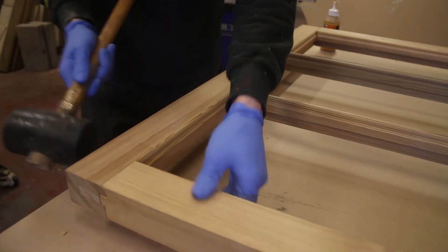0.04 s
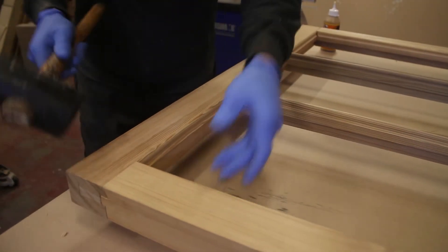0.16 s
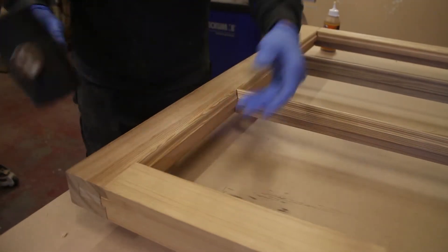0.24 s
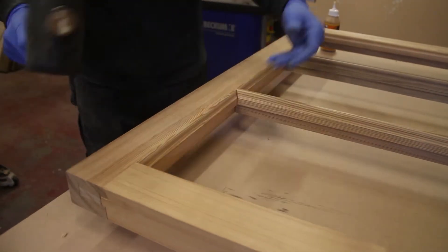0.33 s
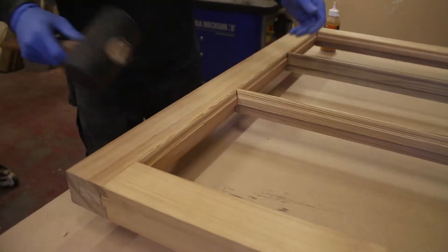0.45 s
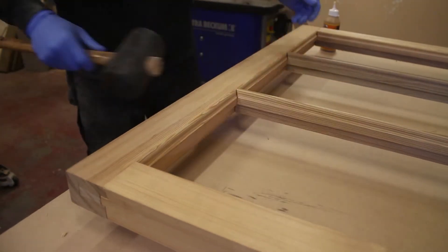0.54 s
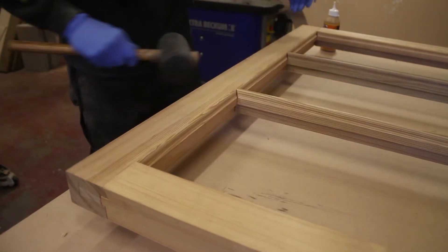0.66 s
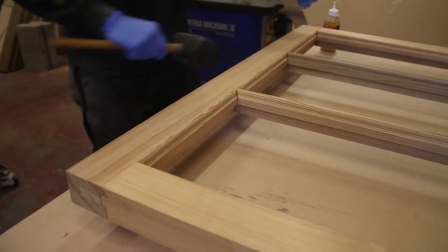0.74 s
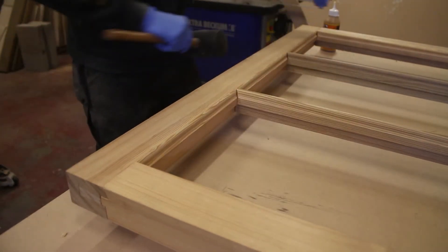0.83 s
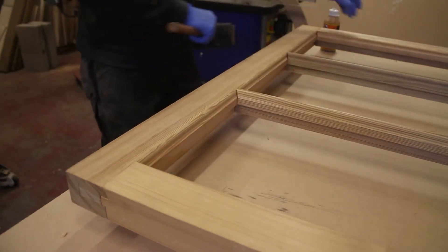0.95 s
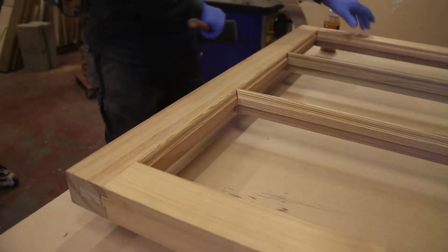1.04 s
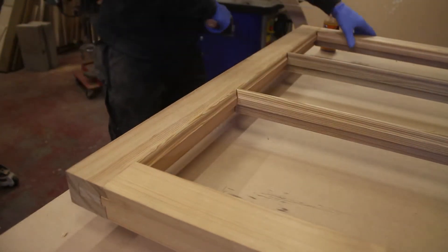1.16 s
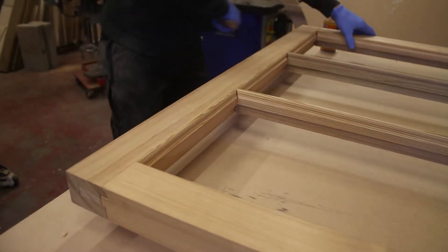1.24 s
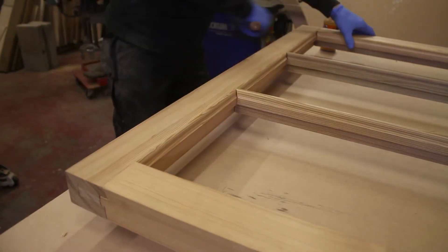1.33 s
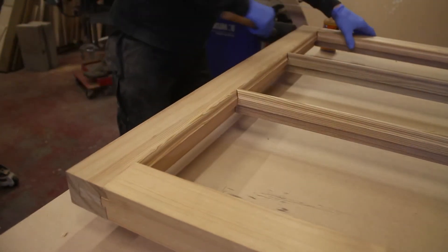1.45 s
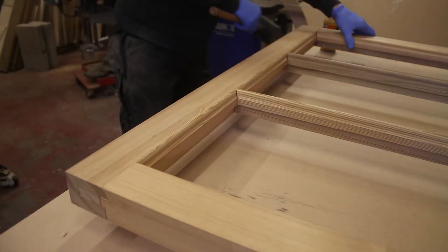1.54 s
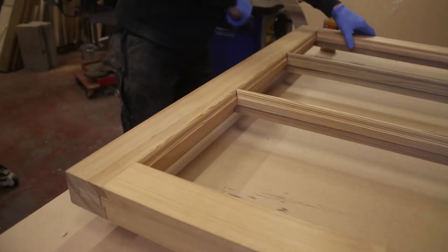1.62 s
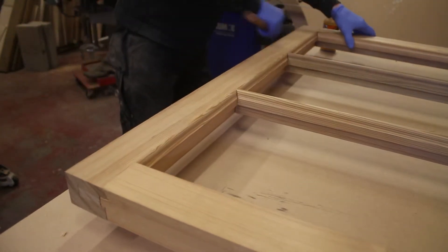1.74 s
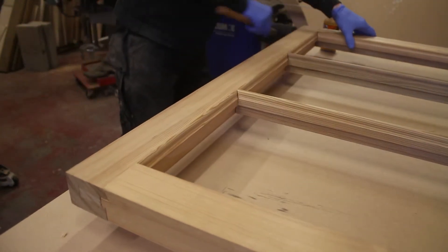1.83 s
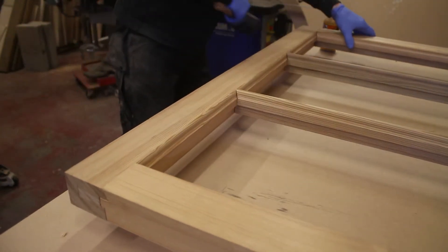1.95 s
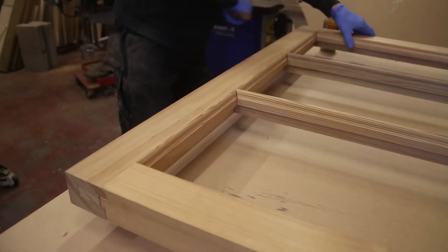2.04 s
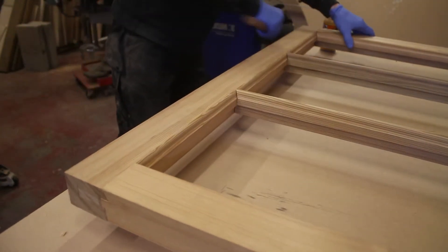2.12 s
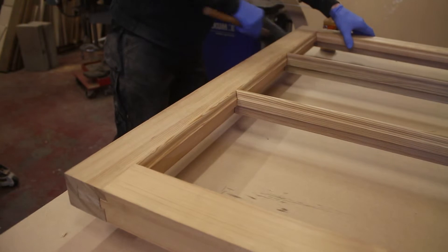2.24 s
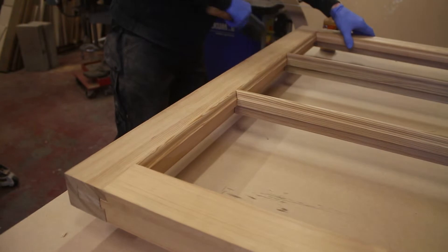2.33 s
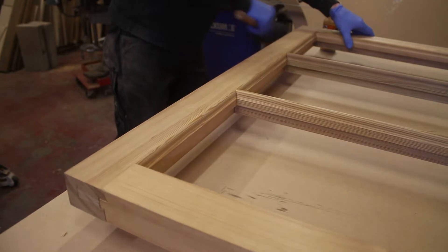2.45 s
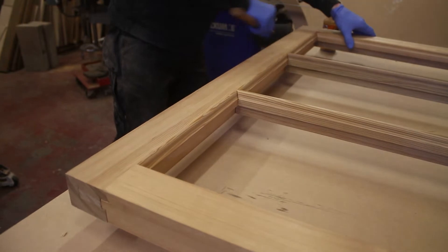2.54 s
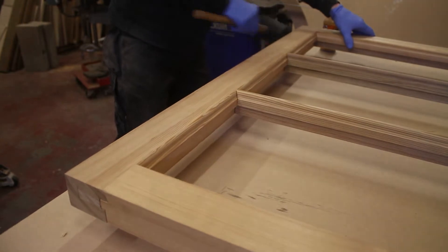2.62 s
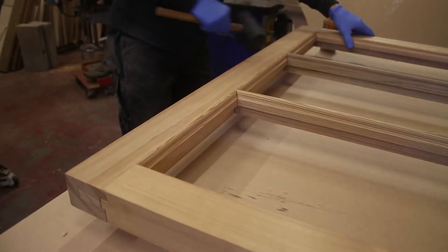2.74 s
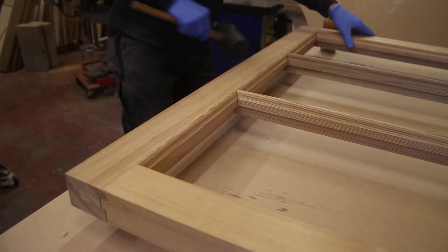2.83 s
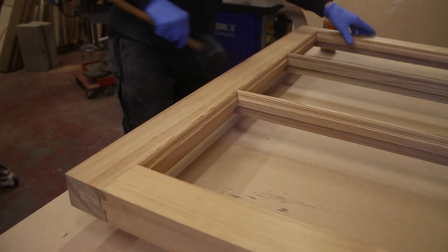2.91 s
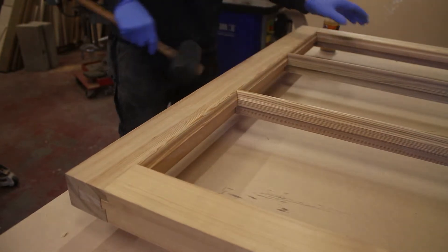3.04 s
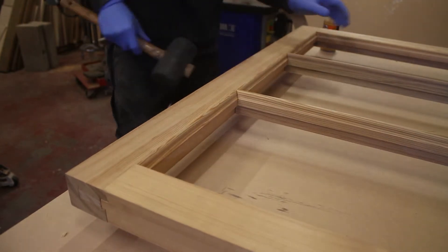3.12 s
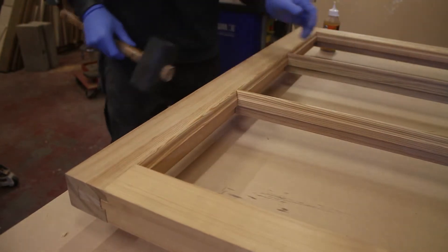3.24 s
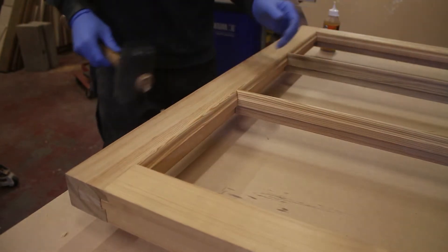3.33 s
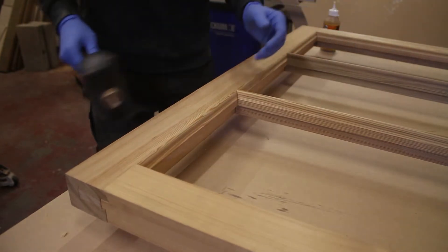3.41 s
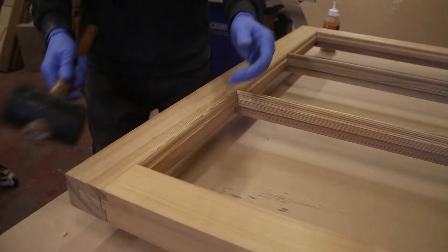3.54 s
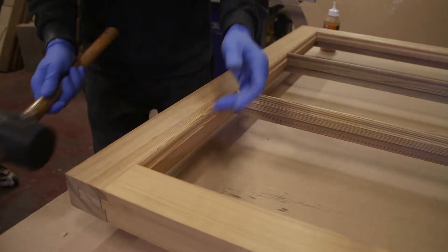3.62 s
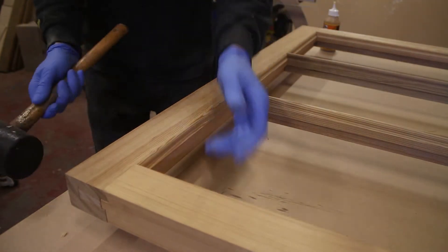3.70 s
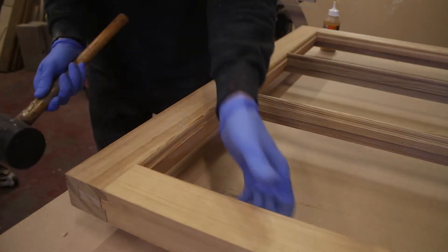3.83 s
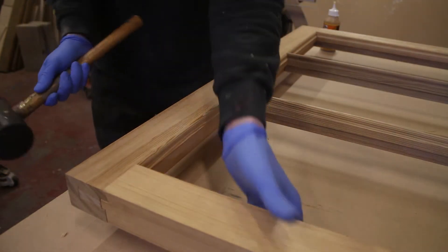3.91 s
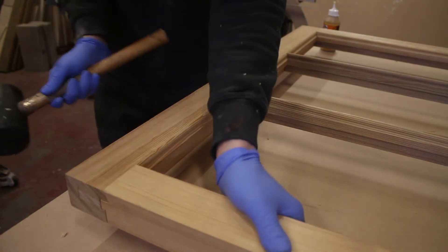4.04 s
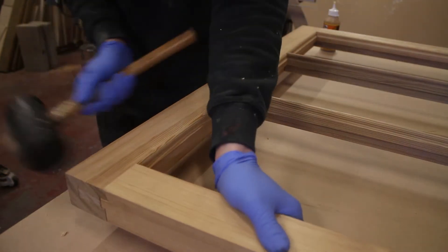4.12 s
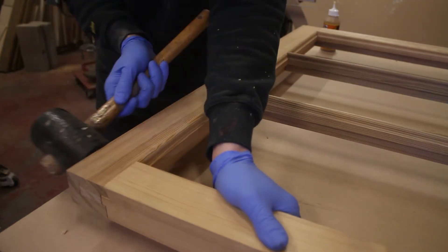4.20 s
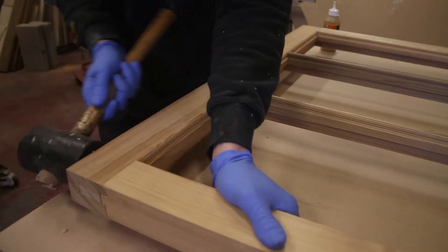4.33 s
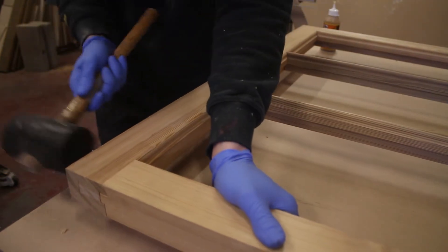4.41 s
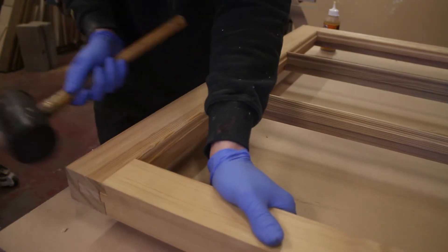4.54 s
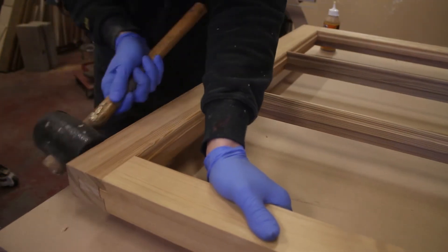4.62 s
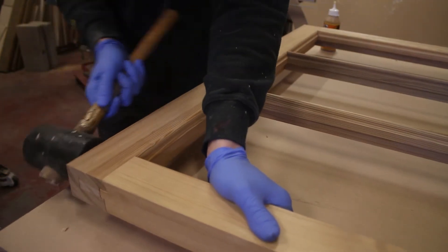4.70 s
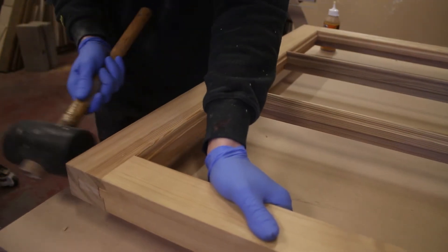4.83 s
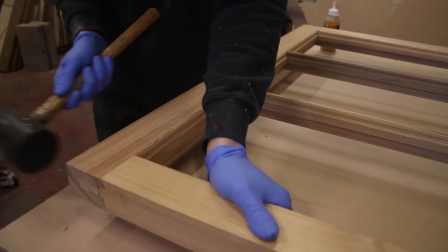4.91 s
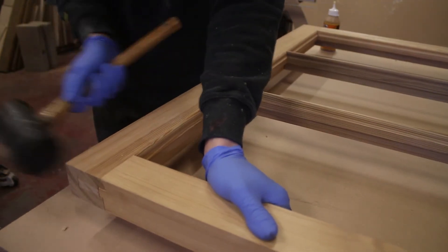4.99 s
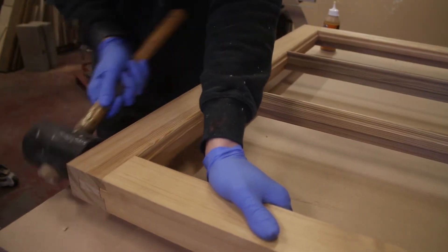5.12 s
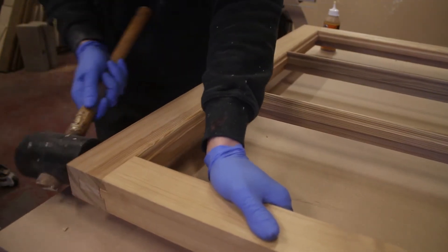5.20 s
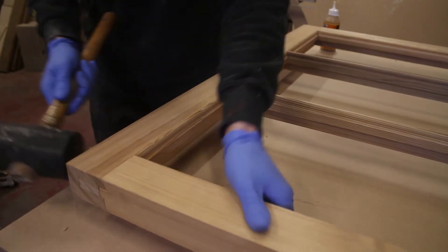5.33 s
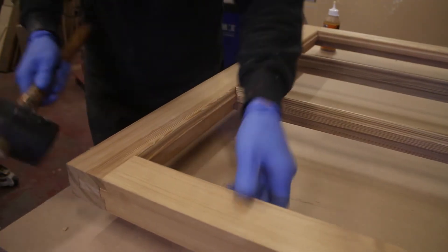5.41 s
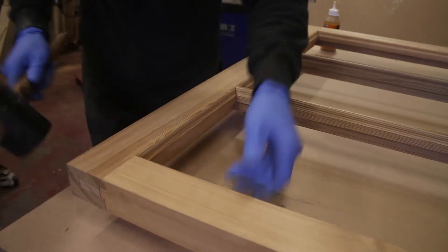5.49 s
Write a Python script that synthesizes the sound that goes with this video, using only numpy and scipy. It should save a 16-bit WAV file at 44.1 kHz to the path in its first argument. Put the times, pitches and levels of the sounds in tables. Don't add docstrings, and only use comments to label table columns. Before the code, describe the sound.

Loud, clipped mallet cracks ring a glued wooden frame, with room echo, cloth rubs and faint lamp hum between the blows.

```python
import sys
import numpy as np
from scipy import signal
from scipy.fft import rfft, irfft
from scipy.io import wavfile
from scipy.ndimage import uniform_filter1d

SR = 44100
rng = np.random.default_rng(int(sys.argv[2]) if len(sys.argv) > 2 else 0)


def unload_wav(signal):
    wavfile.write(
        sys.argv[1],
        SR,
        np.round(np.clip(np.atleast_2d(signal).T, -1, 1) * 32767).astype(np.int16),
    )


def volts_from_db(level):
    exponent = np.asarray(level, float) / 20
    return 10 ** exponent


N = 245195

# f/Hz, level/dB per Hz
AIR = [(15, -28), (30, -18.5), (70, -15.5), (130, -13), (250, -11.5), (420, -20), (620, -21.5), (1100, -19),
       (1700, -23.5), (3000, -31.5), (6000, -33.5), (11000, -40), (16000, -47.5)]
# f/Hz, side minus mid/dB
AIR_SIDE = [(60, -4.5), (110, 1), (200, -7.5), (380, -1.5), (700, -1), (1290, -4.5), (2380, 2), (4400, 1.5),
            (8120, 1), (15000, 1)]
# f/Hz, rms level/dB
HUM = [(50, -65), (100, -54), (150, -60.5), (200, -59), (300, -58.5), (400, -58), (500, -65.5)]
# t/s, peak level/dB, f/Hz, time to fall 60 dB/s
TAPS = [(3.212, -30, 231, 0.027), (3.213, -33, 502, 0.045), (3.24, -36.5, 253, 0.05),
        (3.272, -39, 260, 0.039), (3.293, -40, 254, 0.032), (3.309, -38, 232, 0.034),
        (3.373, -35, 200, 0.012), (4.10, -40, 167, .2), (4.119, -48, 189, 0.17), (4.136, -40, 180, 0.15),
        (4.243, -34.5, 166, 0.13)]
# t/s, half length/s, level/dB
SWISHES = [
    (0.126, 0.032, -52),
    (0.368, 0.014, -58),
    (2.972, 0.013, -55),
    (3.003, 0.012, -52.5),
    (3.04, .006, -54),
    (4.033, .006, -48),
    (5.432, 0.057, -47.5),
]
# peak t/s, level/dB, 20 dB rise/s, 20 dB fall/s, brightness/dB
SLEEVE_STROKES = [
    (.242, -46.5, .06, .3, -8.5),
    (.466, -55, 0.055, .06, 8),
    (.56, -60, 0.14, .2, 5),
    (.992, -48.5, 0.056, .17, 1.5),
    (1.25, -52.5, 0.022, .3, -1),
    (1.344, -46, 0.14, .3, 2),
    (1.436, -56.5, 0.032, .01, 0),
]
GLOVE_STROKES = [
    (2.974, -59.5, .1, 0.27, 17),
    (3.224, -65, 0.036, 0.21, -21),
    (3.36, -54.5, 0.072, 0.12, 10),
    (3.55, -57.5, 0.3, .5, 10),
    (3.735, -35, 0.039, 0.11, -2),
    (3.785, -37.5, 0.094, 0.22, 1),
    (4.09, -45.5, 0.03, 0.054, 11),
    (4.02, -60, 0.14, 0.37, 13),
    (4.24, -59, 0.044, 0.045, 7),
]
# f/Hz, width/Hz, level/dB
RUB_PEAKS = [(630, 90, -2.0), (2100, 300, 1.0), (3050, 400, -1.0)]
# t/s, level/dB, f/Hz, length/s
GRAZE = (5.1286, -14.0, 8000, .002)
# t/s, overload/dB, knock/dB, echo bass/dB, echo treble/dB
FAR_BLOWS = [
    (1.4478, 17.5, -9, 12, 9.5),
    (1.8298, 22.5, -13.5, 9.5, 3.5),
    (2.2013, 23.5, -15, 3.5, 7.5),
    (2.5552, 21.5, -9, 7, 4.5),
]
NEAR_BLOWS = [
    (-.11, 22.85, 0, 0.092, .1),
    (4.2624, 23.1, -13.5, 6.5, 0.042),
    (4.6869, 23.4, -12.5, 0.033, 0.72),
    (5.1304, 24, -16.5, 0.81, 0.12),
]
# f/Hz, level/dB, time to fall 60 dB/s
FAR_MODES = [
    [(278, -10, 0.14), (541, -10, 1.0), (830, -17, 0.079), (1170, 6, 0.0058), (1597, -16.5, 0.083),
     (2000, -8, 0.026), (4320, -11, 0.012), (4540, -30, 0.19)],
    [(532, 7, 0.081), (686, -5, 0.12), (840, -4.5, 0.14), (1140, -2.5, 0.089), (1540, -4.5, 0.41),
     (2310, 4.5, 0.083), (3080, -7.5, 0.027), (3260, -47.5, 0.26)],
    [(526, 5.5, 0.13), (802, -1.5, 0.086), (1090, -3.5, 0.34), (1380, -11, 0.16), (1630, -3.5, 0.11),
     (2495, 3.5, 0.024), (3000, -8, 0.05), (3460, -3.5, 0.022)],
    [(696, -1, 0.17), (1205, -4, 0.027), (1630, 4.5, 0.0068), (2100, -24, 0.14), (2550, -10.5, 0.021),
     (4270, -14, 0.017), (4820, -4, 0.0061), (5600, -85, 0.093)],
]
# f/Hz, level/dB, time to fall 60 dB/s
NEAR_MODES = [
    [],
    [(699, -1.5, 0.096), (1130, -5.5, 0.0068), (1520, -9.5, 0.048), (1860, 3, 0.011), (3350, -37, 0.011),
     (3920, -44.5, 0.11), (4160, -8, 0.031), (5814, -42, 0.016)],
    [(610, 5.5, 5.0), (1220, -4, 0.011), (1750, -6.5, 0.041), (2390, 5.5, 0.014), (2540, 5.5, 0.018),
     (2980, 7.5, 0.0068), (3470, -19, 0.019), (4324, 3.5, 0.0063)],
    [(722, 13, 5.0), (1150, 5.5, 0.1), (1637, -6, 5.0), (2530, 4, 0.011), (2790, 4, 0.026),
     (3600, -36, 0.097), (3920, -8.5, 0.015), (5240, -23, 0.046)],
]
# f/Hz, level/dB per Hz
FAR_ECHO = [(24, -64), (45, -27), (87, -12.5), (137, -11), (175, -5.5), (345, -2.5), (714, 6.5), (940, 2),
            (1440, 0.5), (1750, -8.5), (2400, -10), (4600, -24.5), (5300, -25.5), (9500, -32), (15500, -48)]
# f/Hz, level/dB per Hz
NEAR_ECHO = [(24, -52), (45, -26.5), (127, -12.5), (175, -5), (328, -7.5), (480, -0.5), (696, -4),
             (872, -7.5), (1300, -1.5), (1670, -14.5), (2440, -12.5), (4700, -22.5), (5500, -23.5),
             (9500, -32), (15500, -44.5)]
# f/Hz, level/dB per Hz
FIRST_ECHO = [(24, -57), (40, -33.5), (130, -22.5), (175, -11.5), (382, -13.5), (503, -10.5), (872, -12),
              (1150, -2), (1630, -19), (1900, -19), (4450, -28), (8320, -40), (16000, -49)]
# f/Hz, width/Hz
RAILS = [(240, 64), (730, 290), (1140, 40), (2400, 990), (3900, 2200)]
FAR_LIFT = (3.4, 1.2, 5.3, 0.42, 1.1)
NEAR_LIFT = (3.6, 5.1, 2.45, 0.91, 0.58)
# f/Hz, width/Hz, lift/dB
FAR_SPOTS = [
    (400, 750, 4.5),
    (1516, 150, 2.5),
    (1890, 1050, 5.5),
    (734, 35, 4.5),
]
# f/Hz, width/Hz, lift/dB
NEAR_SPOTS = [
    (1110, 33, 1),
    (1920, 350, 7.4),
    (2380, 400, 2.2),
    (1176, 250, 2.15),
]
# f/Hz, time to fall 60 dB/s
ROOM_T60 = [(60, 1), (160, 0.53), (420, 0.62), (1100, 0.58), (2910, 0.65), (7680, 0.48), (15000, 0.14)]
# f/Hz, side minus mid/dB
ROOM_SIDE = [(60, -6.5), (110, -11), (200, -14.5), (380, -17), (700, -12), (1290, -9.5), (2380, -6.5),
             (4400, -6.5), (8120, 0), (15000, 2.5)]


def at_hz(points, hz):
    table = np.array(points)
    return np.interp(np.log(np.maximum(hz, 1)), np.log(table[:, 0]), table[:, 1])


def rms_one(x):
    return x / np.sqrt(np.mean(x ** 2) + 1e-20)


def add(out, sound, s):
    i = round(s * SR)
    part = sound[:, max(-i, 0):N - i]
    start = max(i, 0)
    out[:, start:start + part.shape[1]] += part


def diffuse(gain, side_table, size):
    mid, side = rfft(rng.standard_normal((2, size))) * gain / np.sqrt(np.mean(gain ** 2))
    side = side * volts_from_db(at_hz(side_table, np.fft.rfftfreq(size, 1 / SR)))
    return np.array([mid + side, mid - side])


def resonate(x, hz, sharpness):
    return signal.lfilter(*signal.iirpeak(hz, sharpness, fs=SR), x)


def workshop():
    t = np.arange(N) / SR
    air_gain = volts_from_db(at_hz(AIR, np.fft.rfftfreq(N, 1 / SR)))
    out = volts_from_db(-53) * irfft(diffuse(air_gain, AIR_SIDE, N), N)
    wavers_db = [0.52 * rms_one(uniform_filter1d(rng.standard_normal(N), size=5000)) for line in HUM]
    for (hz, db), waver_db in zip(HUM, wavers_db):
        out = out + volts_from_db(db - 0.5 + waver_db) * np.sin(2 * np.pi * (hz * t + rng.random()))
    return out


def taps():
    out, t = np.zeros((2, N)), np.arange(round(.2 * SR)) / SR
    muffle = signal.butter(2, 600, fs=SR, output="sos")
    for s, db, hz, t60 in TAPS:
        puff = signal.sosfilt(muffle, rng.standard_normal((2, len(t))))
        ring = np.sin(2 * np.pi * hz * t)
        onset = np.minimum(t / 0.00062, 1)
        add(out, volts_from_db(db - 60 * t / t60) * (ring + 1.7 * puff) * onset, s)
    return out


def band_noise(low_hz, high_hz, grain_db):
    uneven = volts_from_db(grain_db * rms_one(uniform_filter1d(rng.standard_normal(N), size=300)))
    low_cut = signal.butter(1, low_hz, "high", fs=SR, output="sos")
    high_cut = signal.butter(3, high_hz, fs=SR, output="sos")
    rough = rng.standard_normal((2, N)) * uneven
    mid, side = signal.sosfilt(np.vstack([low_cut, high_cut]), rough)
    return rms_one(np.array([mid + 0.71 * side, mid - 0.11 * side]))


def hollow(x, peaks):
    out = x
    for hz, width, db in peaks:
        out = out + volts_from_db(db) * rms_one(resonate(x, hz, hz / width))
    return rms_one(out)


def brushing():
    t, out = np.arange(N) / SR, 0
    sleeve = band_noise(1900, 4280, grain_db=1.7)
    glove = hollow(2 * band_noise(1000, 4200, grain_db=1.0), RUB_PEAKS)
    dull = band_noise(200, 460, grain_db=1.0)
    thin = band_noise(7600, 8300, grain_db=1.8)
    for strokes, rub in [(SLEEVE_STROKES, sleeve), (GLOVE_STROKES, glove)]:
        for s, db, rise, fall, bright_db in strokes:
            stroke = volts_from_db(db - 20 * np.maximum((s - t) / rise, (t - s) / fall))
            friction = rub + volts_from_db(-7.5 - bright_db) * dull + volts_from_db(-17 + bright_db) * thin
            out = out + stroke * friction
    for s, half, db in SWISHES:
        out = out + thin * volts_from_db(db) * np.exp(-((t - s) / half) ** 2)
    return out


def graze():
    s, db, hz, length = GRAZE
    t = np.arange(N) / SR - s
    squeak = rms_one(resonate(rng.standard_normal(N), hz, 5.0))
    swell = np.clip(t / length, 0, 1) * (t < 1.6 * length)
    return volts_from_db(db) * squeak * swell * np.array([[1], [.4]])


def echo(spectrum, singing, bass_db, treble_db):
    size, rail_t60_s = 40960, 0.7
    hz, t = np.fft.rfftfreq(size, 1 / SR), np.arange(size) / SR
    lift = sum(db / (1 + (2 * (hz - f) / width) ** 2) for f, width, db in singing)
    tilt = at_hz([(150, bass_db), (500, 0.011), (1500, 0.00089), (4000, treble_db)], hz)
    noise = diffuse(volts_from_db(at_hz(spectrum, hz) + lift + tilt), ROOM_SIDE, size)
    plain = noise * volts_from_db(-lift)
    rails = irfft(noise - plain, size)
    out = rails * (1 - np.exp(-t / 0.0043)) * volts_from_db(-60 * t / rail_t60_s)
    octave = np.log2(np.clip(hz, 60, 15360) / 60)
    for k, centre in enumerate(60 * 2 ** np.arange(9)):
        share = np.maximum(1 - np.abs(octave - k), 0)
        rise = 1 - np.exp(-t / (0.00042 + 0.42 / centre))
        fall = volts_from_db(-60 * t / at_hz(ROOM_T60, centre))
        out = out + irfft(plain * share, size) * rise * fall
    return out


def knock(modes, bench_add_db, slap_db, top_hz):
    t = np.arange(round(.12 * SR)) / SR
    contact_s, longest_ring_s, most_cycles = .0005, 0.098, 120
    bench_hz, bench_db = 351, 2.5 + bench_add_db
    slap_s, slap_hz = .0023, 8300
    rings, apart = 0, np.array([[1], [-1]])
    chance = rng.standard_normal((len(modes), 2))
    for (hz, db, t60), (start, across) in zip(modes, chance):
        shift = 1.56 * start + .00007 * hz * across * apart
        swell = np.minimum(t * hz, 1)
        ring_s = np.clip(t60, .008, min(longest_ring_s, most_cycles / hz))
        rings = rings - swell * volts_from_db(db - 60 * t / ring_s) * np.sin(2 * np.pi * hz * t + shift)
    crack = signal.lfilter([.2], [1, -1.25, .5], rng.standard_normal((2, len(t))))
    crack = volts_from_db(-0.5 - 60 * t / 0.0032) * (crack[0] + 0.66 * apart * crack[1])
    slap = resonate(rng.standard_normal((2, len(t))), slap_hz, 2.5)
    slap_burst = volts_from_db(slap_db) * np.exp(-((t - slap_s) / 0.00064) ** 2)
    slap = slap_burst * (slap[0] + 0.55 * apart * slap[1])
    bench = volts_from_db(bench_db - 60 * t / 0.018) * np.sin(2 * np.pi * bench_hz * t)
    bench = bench * np.minimum(t * bench_hz / 2, 1)
    sound = rings / np.abs(rings).max() + crack + slap + bench
    sound = sound * np.minimum(t / contact_s, 1)
    slim_bars = signal.butter(3, [150, top_hz], "band", fs=SR, output="sos")
    return signal.sosfilt(slim_bars, sound)


def strike_joint(out, blows, struck, spots, lifts, spectrum, echo_db, **contact):
    for (s, over_db, knock_db, bass_db, treble_db), modes, spot in zip(blows, struck, spots):
        if modes:
            add(out, volts_from_db(over_db + knock_db) * knock(modes, **contact), s)
        singing = [(*rail, db) for rail, db in zip(RAILS, lifts)] + [spot]
        sent = spectrum if modes else FIRST_ECHO
        add(out, volts_from_db(over_db + echo_db) * echo(sent, singing, bass_db, treble_db), s)


def mallet():
    out = graze()
    strike_joint(out, FAR_BLOWS, FAR_MODES, FAR_SPOTS, FAR_LIFT, FAR_ECHO, echo_db=-22,
                 bench_add_db=-2, slap_db=-12.5, top_hz=9500)
    strike_joint(out, NEAR_BLOWS, NEAR_MODES, NEAR_SPOTS, NEAR_LIFT, NEAR_ECHO, echo_db=-23,
                 bench_add_db=1, slap_db=-17, top_hz=19000)
    return out


def scene():
    return mallet() + brushing() + taps() + workshop()


def roll_off(x):
    return signal.sosfilt(signal.butter(12, 16110, fs=SR, output="sos"), x)


def record(dry):
    duck_s, recovery_db_s, full_scale = 0.0067, 111.5, .97
    t, duck = np.arange(N) / SR, 0
    for s, over_db, *rest in [*FAR_BLOWS, *NEAR_BLOWS]:
        since = np.maximum(t - s, 0)
        one_duck = over_db * (1 - np.exp(-since / duck_s)) - recovery_db_s * since
        duck = np.maximum(duck, one_duck)
    duck = uniform_filter1d(duck, size=41)
    hot = dry * volts_from_db(-duck)
    clipped = hot / (1 + np.abs(hot / full_scale) ** 10) ** (1 / 10)
    return roll_off(clipped)


dry = scene()
out = record(dry)
unload_wav(out)
```